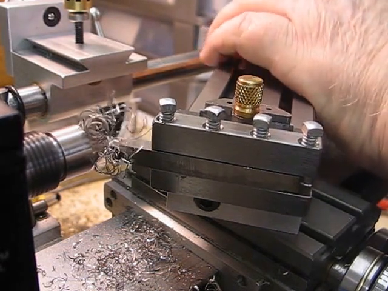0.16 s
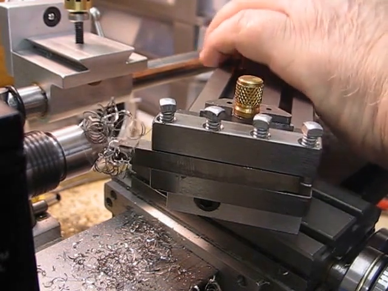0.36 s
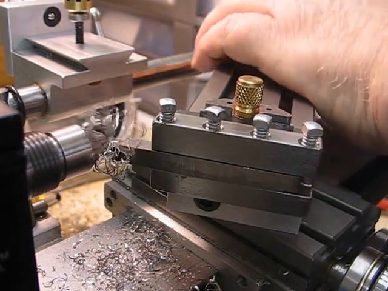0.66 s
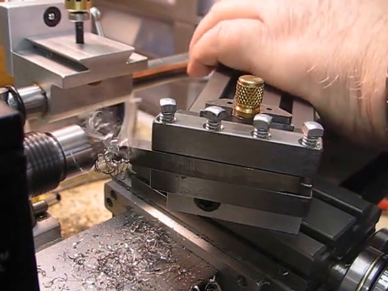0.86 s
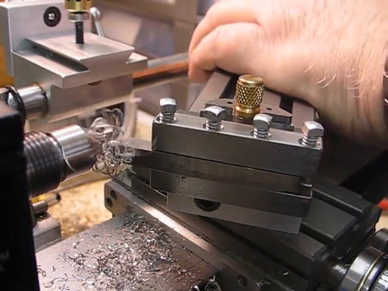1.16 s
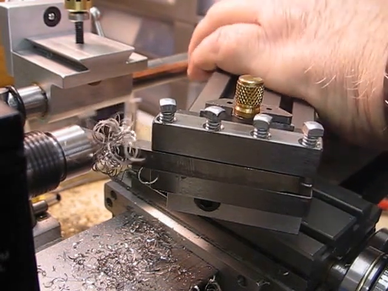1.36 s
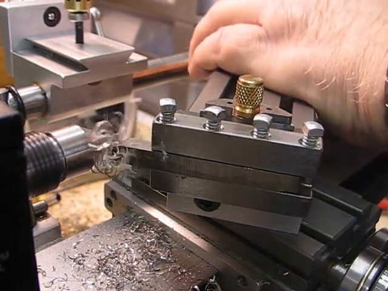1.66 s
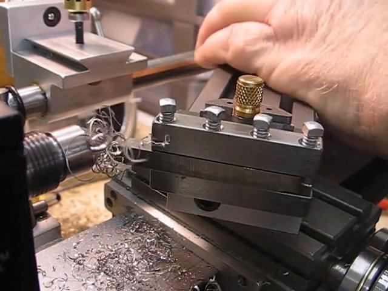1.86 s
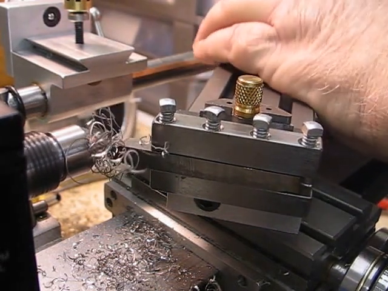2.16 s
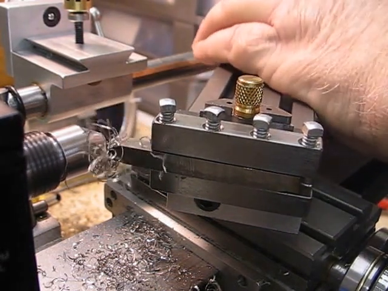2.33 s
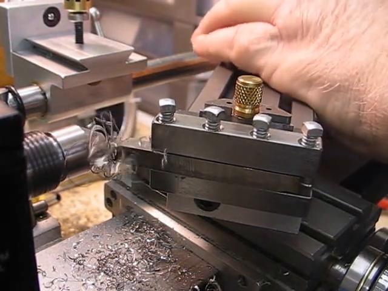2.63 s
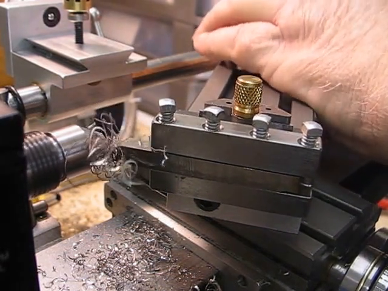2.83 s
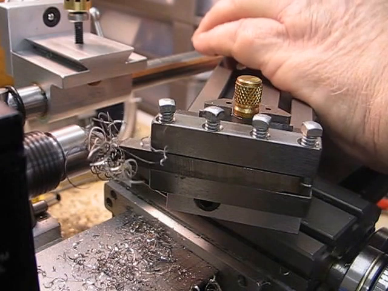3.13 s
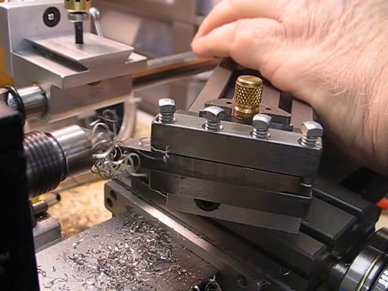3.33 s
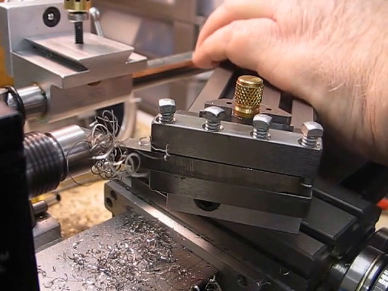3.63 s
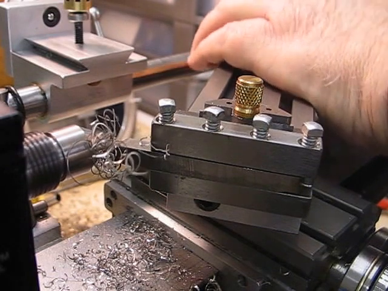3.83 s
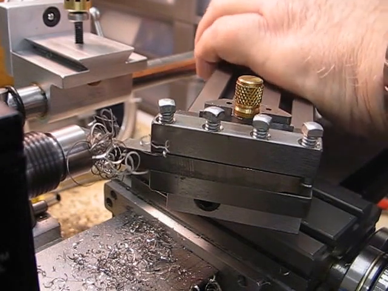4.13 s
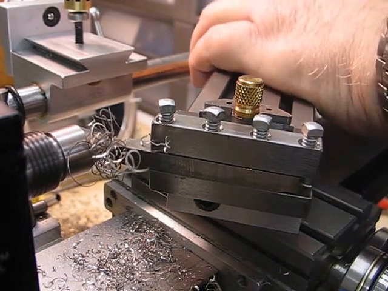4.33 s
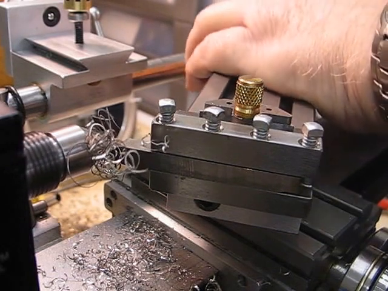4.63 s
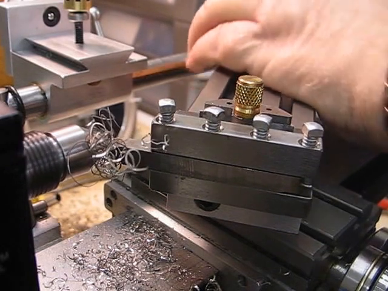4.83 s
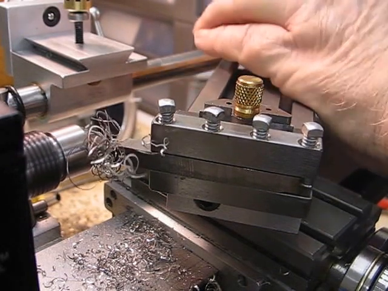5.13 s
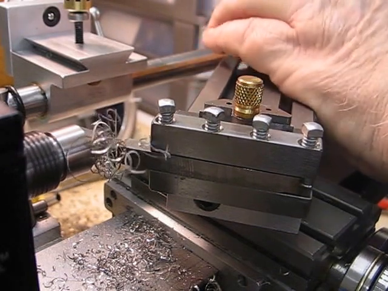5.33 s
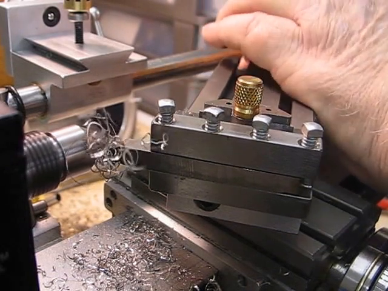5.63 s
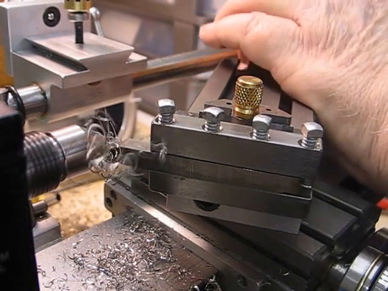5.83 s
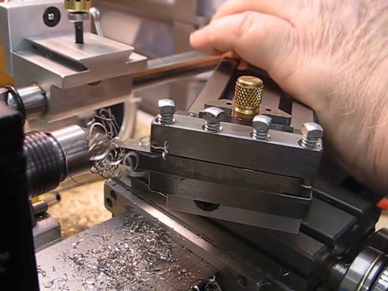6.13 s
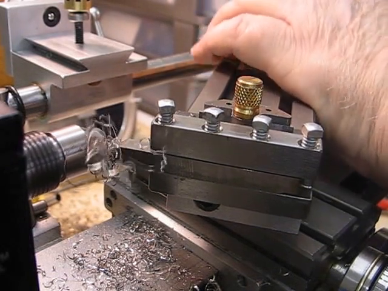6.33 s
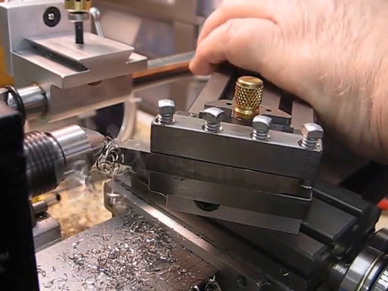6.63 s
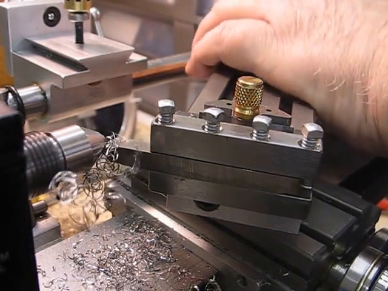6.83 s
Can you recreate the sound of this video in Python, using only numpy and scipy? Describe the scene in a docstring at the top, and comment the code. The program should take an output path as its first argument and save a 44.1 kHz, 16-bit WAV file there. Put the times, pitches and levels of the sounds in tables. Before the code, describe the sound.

A small lathe is heard close up in a workshop with a short, dull room tail. From 0 s its motor gives a steady low hum with a faint whine, under soft drive and fan noise. A light, grainy scrape grows during the first second, fluttering rapidly with the spinning work. Around 1 s the first short squeals appear, midrange and slightly nasal, sagging as they swell. From 1.8 to 2.4 s they cluster, with a rough low groan near 2.1 s. After a sparser moment, dense stuttering chatter fills 2.9 to 4.5 s, with brighter metallic overtones and stronger scraping. From 4.6 s squeals are scattered while the hum beats and the bed rumbles. Thin, very high squeaks stand out around 5.6 to 5.9 s, the strongest at 5.9. From 6.7 s squeals, squeaks and tearing bursts crowd together, peaking near 6.9 s as the scrape surges and everything stops mid-cut.

```python
"""A tool shaves stainless steel on a small lathe and chatters in short squeals: tones with overtones
whose pitch sags as they swell. The chip scrapes as grainy noise that rings the tool post, and the
edge squeaks in short high pings. The bed groans and rumbles as low tones and shaped noise, and the
bench shudders. Behind them the mains motor hums and whines in steady tones over drive and fan noise,
and the workshop adds a short tail to the cutting sounds."""
import sys
import numpy as np
from scipy import signal
from scipy.fft import rfft, irfft
from scipy.io import wavfile
from scipy.ndimage import uniform_filter1d

SR = 44100
rng = np.random.default_rng(int(sys.argv[2]) if len(sys.argv) > 2 else 0)


def wrap_up_sound(samples):
    """Save the sound to the file named by the first command line argument, as 16-bit audio."""
    columns = np.atleast_2d(samples).T
    # keep every value between -1 and 1, then stretch to whole-number steps
    tamed = np.clip(columns, -1, 1)
    steps = np.round(tamed * 32767).astype(np.int16)
    wavfile.write(sys.argv[1], SR, steps)


N = 307818
TIME = np.arange(N) / SR   # s

# Chatter squeals: peak t/s, level/dB, rise/ms, fall/ms (3 ms or more is used), lowest pitch f/Hz,
# strength of the overtones from the third up/dB
SQUEALS = [(1.049, -24.5, 25, 22, 1470, -11), (1.081, -16, 11, 8.5, 1349, -13),
           (1.269, -20.5, 7, 12, 1367, -12), (1.287, -19.5, 8, 12, 1463, -13),
           (1.326, -19, 8, 11, 1443, -15), (1.477, -15, 6.5, 7.6, 1230, -2), (1.486, -18, 6, 20, 1235, 1),
           (1.555, -26.5, 18, 9.4, 1180, -7), (1.797, -15.5, 6, 9, 1250, -7),
           (1.806, -16, 5, 13.4, 1228, -2), (1.871, -23, 10, 7.9, 1192, -15),
           (1.972, -17.5, 18, 19.7, 1340, -13), (1.99, -16, 10, 19.7, 1202, -2),
           (2.018, -20, 5, 5.4, 1286, -20), (2.063, -22, 21, 7.2, 1225, -16),
           (2.085, -24, 6, 6.1, 1406, -18), (2.125, -26.5, 16, 12.5, 1244, -12.5),
           (2.182, -14.5, 13, 15.5, 1273, -10), (2.207, -20, 16, 13.4, 1177, 6.5),
           (2.241, -18.5, 15, 2.6, 1180, -17), (2.273, -19.5, 22, 14, 1194, -15),
           (2.338, -30.5, 29, 12.5, 1230, -14.5), (2.372, -25, 14, 13, 1426, -18),
           (2.429, -15, 8, 3.8, 1370, -16), (2.588, -27, 19, 8.3, 1494, -18),
           (2.84, -19, 9, 6.9, 1377, -10), (2.926, -11.5, 7, 10, 1310, -7.5),
           (2.989, -13, 12, 17, 1277, -9.5), (3.062, -26, 21, 11.3, 1248, -9),
           (3.116, -14.5, 7, 7.2, 1260, -7.5), (3.127, -15, 5.4, 19, 1219, -2),
           (3.158, -15.5, 5, 4.5, 1330, -10), (3.194, -17.5, 13, 9.6, 1277, -10),
           (3.21, -15.5, 5, 11.9, 1230, -4), (3.228, -22, 9, 9.4, 1310, -20),
           (3.254, -21.5, 7, 6, 1243, -12), (3.291, -26.5, 27, 10.3, 1390, -1),
           (3.337, -11, 6, 5.8, 1248, -2), (3.361, -15.5, 14, 18, 1276, -7.5),
           (3.412, -25, 14, 24, 1232, -12), (3.524, -16.5, 18, 17.5, 1401, -12),
           (3.557, -13.5, 7, 5.6, 1287, -5), (3.576, -15, 11, 9.1, 1264, -8.5),
           (3.63, -22.5, 11, 12, 1252, -13), (3.731, -24.5, 33, 20, 1419, -13.5),
           (3.797, -27.5, 25, 28, 1467, -24), (3.931, -17.5, 6, 12.5, 1398, -6.5),
           (3.976, -16, 20, 19.7, 1345, -13.5), (3.995, -13, 9, 8, 1169, -2), (4.009, -19, 6, 11, 1175, -1),
           (4.034, -18, 7, 5.4, 1287, -13), (4.065, -16, 15, 18.4, 1121, -2.5),
           (4.078, -12.5, 5, 3.5, 1178, 2.2), (4.12, -15.5, 24, 24, 1377, -19),
           (4.142, -13, 8, 8.9, 1177, -4.3), (4.219, -18.5, 19, 15, 1405, -11),
           (4.24, -19, 8, 8.3, 1398, -10), (4.279, -12, 10, 17.4, 1292, -8.5),
           (4.313, -22.5, 5, 11, 1387, -11.5), (4.348, -25, 8, 9.2, 1334, -6.5),
           (4.383, -19.5, 7, 16, 1428, -10.5), (4.423, -13, 12, 7.4, 1310, -19),
           (4.447, -18, 9, 3.8, 1378, -15.5), (4.481, -12, 9, 12, 1265, -4.5),
           (4.502, -18.5, 11, 10, 1303, -7), (4.556, -25.5, 12, 17, 1232, -11),
           (4.856, -15.5, 6, 3.9, 1381, -13), (4.888, -17.5, 18, 8.8, 1410, -7),
           (5.126, -17, 8, 4.3, 1373, -10), (5.141, -29, 6, 5, 1450, -13),
           (5.358, -22, 6, 13.2, 1420, -8.5), (5.653, -26, 7, 9.7, 1397, -4.5),
           (5.702, -11, 17, 6.1, 1312, -5), (5.736, -23.5, 15, 34, 1390, -5.5),
           (5.804, -28.5, 18, 16, 1450, -3.5), (5.912, -13.5, 10, 14.5, 1325, -7),
           (5.952, -22.5, 10, 13, 1436, -3.5), (6.137, -25, 17, 18, 1432, -20),
           (6.23, -25, 5, 10, 1437, -4.5), (6.256, -27.5, 12, 27.7, 1463, -15.5),
           (6.723, -13.5, 16, 15, 1342, -8.5), (6.742, -15.5, 8, 18.3, 1417, -7),
           (6.78, -25.5, 7, 5.1, 1383, -14), (6.798, -30, 7, 12.4, 1402, -9.5),
           (6.821, -23.5, 8, 8, 1436, -22), (6.874, -28, 7, 19, 1434, -12),
           (6.91, -8.5, 13, 2.27, 1330, -11), (6.942, -16, 13, 17, 1337, -3.5)]
# Ringing modes of the tool post: f/Hz, width/Hz, level under the scrape/dB, level under a squeal/dB,
# swing with each turn/dB, lag of that swing/turns
POST_MODES = [(1234, 20, -25.5, -11, -2, 0), (1355, 18, -19, -47, 9, 0), (2486, 78, -17.5, 2.5, -4, 0),
              (2870, 46, -13.5, -5, -6.5, 0), (3434, 33, -15, 13, 4, 0), (3701, 65, -14, 15.5, -0.5, 0),
              (4967, 44, -20, 4, 10, 0), (5547, 24, -17.5, -13, 3.5, 0), (6226, 190, -8.5, 4, 8.5, 0.45),
              (6497, 157, -9.5, -4, 6, 0.13), (6754, 114, -12, 1, 10, 0.00091),
              (7064, 83, -8, -1, 3, -0.14), (8973, 53, -17, 19, -1.5, 0), (11160, 900, 4, 2, -0.5, 0)]
# Moments when the edge snags: t/s, squeak level/dB, level of the tearing burst/dB
SNAGS = [(1.4684, -31, -42), (1.635, -42, -29), (2.2064, -28.5, -18), (2.574, -40, -24.5), (2.73, -40, -26),
         (2.8123, -18, -18), (2.9641, -23, -31), (3.0569, -26, -31), (3.1889, -22.5, -28),
         (3.3211, -28, -22), (3.6235, -19.5, -30.5), (4.0664, -26.5, -17.5), (4.136, -15.5, -29.5),
         (4.449, -16.5, -29), (4.545, -40, -25.5), (5.106, -34.5, -27), (5.142, -18, -28.5),
         (5.45, -36.5, -30.5), (5.5906, -10.5, -30.5), (5.6822, -15.5, -20.5), (5.7146, -14.5, -16),
         (5.78, -32, -24), (5.9, -1, -14.5), (6.101, -13, -21.5), (6.13, -36, -22.5), (6.23, -38, -23.5),
         (6.289, -17.5, -23.5), (6.64, -30, -26), (6.7048, -37.5, -13), (6.756, -8.5, -13),
         (6.7911, -6, -19), (6.82, -7, -37), (6.855, -35, -19), (6.949, -27.5, -13)]
# How hard the cut loads the bed, as the level of its rumble: t/s, level/dB
LOAD = [(0.0, -45), (0.15, -47.5), (1.16, -40.5), (1.32, -42.5), (1.77, -36.5), (2.41, -37.5), (2.7, -37),
        (2.86, -36), (3.3, -36.5), (3.75, -39), (3.89, -37), (4.59, -38), (5.46, -33), (5.56, -37),
        (6.53, -35.5), (6.98, -32)]


def from_db(db):
    """Turn decibels into gain."""
    return 10 ** (np.asarray(db) / 20)


def rms_one(x):
    """Scale to an rms of 1."""
    return x / np.sqrt(np.mean(x ** 2) + 1e-20)


def in_time(rows):
    """Draw straight lines between the rows and give every column sample by sample."""
    s, *columns = np.transpose(rows)
    return [np.interp(TIME, s, c) for c in columns]


def drift(rate_hz):
    """Slow random wandering with rms 1: noise through two low-pass poles, made at every 40th sample."""
    r = np.exp(-2 * np.pi * rate_hz * 40 / SR)
    noise = rng.standard_normal(N // 40 + 2002)
    slow = signal.lfilter([1], [1, -2 * r, r * r], noise)[2000:]
    return np.interp(np.arange(N) / 40, np.arange(len(slow)), rms_one(slow))


def resonate(x, hz, width_hz):
    """One resonance, like a struck part that rings at its own pitch; gain about 1 at the top."""
    r = np.exp(-np.pi * width_hz / SR)
    top = [(1 - r * r) / 2, 0, (r * r - 1) / 2]
    bottom = [1, -2 * r * np.cos(2 * np.pi * hz / SR), r * r]
    return signal.lfilter(top, bottom, x + 1e-18)


def ringing_noise(hz, width_hz, second_width_hz):
    """A mode kept ringing by random shaking: noise through two resonances at one pitch, rms 1."""
    once = resonate(rng.standard_normal(N), hz, width_hz)
    return rms_one(resonate(once, hz, second_width_hz))


def coloured(spectrum):
    """Steady noise with the given spectrum, rms 1."""
    hz = np.maximum(np.fft.rfftfreq(N, 1 / SR), 1)
    points = np.array(spectrum)
    shape = from_db(np.interp(np.log(hz), np.log(points[:, 0]), points[:, 1]))
    return rms_one(irfft(rfft(rng.standard_normal(N)) * shape, N))


def swell(s, rise, fall):
    """Samples around a peak, their time from it, and a swell in dB: -8 dB one rise before, one fall after."""
    at = slice(max(int((s - 3 * rise) * SR), 0), min(int((s + 4 * fall) * SR), N))
    t = TIME[at] - s
    return at, t, -8 * np.where(t < 0, (np.abs(t) / rise) ** 1.7, (np.abs(t) / fall) ** 1.07)


def squeals():
    """One chattering tool: overlapping squeals share its pitch; overtones appear only near a swell's top."""
    free_hz = 1457
    entry_share, exit_share = .45, .45   # how far towards the free pitch a squeal starts and ends
    second_db_per_hz = 0.0382   # the second partial grows with the depth of the sag
    # Second partial of the squeals, before the sag adds to it: t/s, level against the first/dB
    second_partial = [(1.0, -13), (2.2, -16), (3.3, -13.5), (4.5, -13.5), (5.5, -16), (6.3, -14),
                      (6.98, -17)]
    ripple = from_db(2.5 * drift(115))
    waver = 1 + 0.00587 * drift(78)
    second_db, = in_time(second_partial)
    power = np.full((8, N), 1e-12)   # one row for each partial
    pull = np.full(N, 1e-12 * free_hz)   # pitch weighted by power
    for s, level_db, rise, fall, low_hz, overtones_db in SQUEALS:
        rise, fall = max(rise, 3) / 1000, max(fall, 3) / 1000   # s
        at, t, swell_db = swell(s, rise, fall)
        sag_hz = free_hz - low_hz
        bend_times = [-.9 * rise, 0, .4 * fall, 1.8 * fall]
        lift_hz = sag_hz * np.interp(t, bend_times, [entry_share, 0, 0, exit_share])
        # The tool leaves the cut and snaps back as the pitch sags: overtones are weaker while it is up
        slack_db = -.05 * lift_hz.clip(0)
        pull[at] += from_db(2 * (level_db + swell_db)) * (low_hz + lift_hz)
        second = second_db[at] + second_db_per_hz * min(sag_hz, 150) + 1.26 * swell_db
        partials_db = [swell_db, second]
        for k in range(3, 9):
            slope_db = -12.5 - 2.65 * (k - 4.5)
            partials_db.append(overtones_db + slope_db + 1.3 * swell_db + k / 2 * slack_db)
        power[:, at] += from_db(2 * (level_db + np.array(partials_db)))
    pitch_hz = uniform_filter1d(pull / power[0], size=130) * waver
    phase = 2 * np.pi * np.cumsum(pitch_hz) / SR
    partials = sum(np.sqrt(p) * np.sin((k + 1) * phase) for k, p in enumerate(power))
    tones = np.sqrt(2) * ripple * partials
    return tones + sum(from_db(db) * resonate(tones, hz, width) for hz, width, _, db, *_ in POST_MODES)


def tearing(steady_db):
    """Strength of the scrape: a steady part, a share of every squeal and a burst at every snag."""
    share_db = -8.5   # the chip tears harder under each squeal
    burst_rise, burst_fall = 0.0032, 0.03   # s
    power = from_db(2 * steady_db)
    for s, level_db, rise, fall, *_ in SQUEALS:
        # This swell lasts about twice as long as the squeal
        at, _, swell_db = swell(s, 2.14 * max(rise, 3) / 1000, 1.94 * max(fall, 3) / 1000)
        power[at] += from_db(2 * (level_db + share_db + swell_db))
    for s, _, tear_db in SNAGS:
        at, _, swell_db = swell(s + burst_rise, burst_rise, burst_fall)
        power[at] += from_db(2 * (tear_db + swell_db))
    return np.sqrt(power)


def cut():
    """The chip tears in dense uneven grains; the work runs out of true, so the post modes flare in turn."""
    ring_follows = 0.34   # the tool rings more while the chip tears harder
    # The cut: t/s, steady chip scrape/dB, edge whistle/dB, tool ring under steady scraping/dB
    cut_levels = [(0, -44, -57, -60), (.33, -38.5, -51, -48), (.95, -39.5, -51, -50),
                  (1.2, -35, -49, -40.5), (1.8, -33, -49, -42.5), (2.39, -32.5, -47, -34),
                  (2.64, -37, -45, -38), (3.0, -37, -46, -36), (3.44, -29.5, -45, -30),
                  (3.9, -31, -41.5, -41.5), (4.14, -29, -41, -34), (4.47, -30, -48, -39),
                  (4.65, -31.5, -46, -31.5), (4.95, -30.5, -40, -37.5), (5.42, -31.5, -45.5, -37),
                  (5.95, -34, -41.5, -38), (6.3, -29, -37.5, -35.5), (6.66, -33.5, -43, -37),
                  (6.98, -23.5, -33, -28)]
    # The spindle: t/s, turns made so far
    spindle = [(0, -.45), (.7, 21.97), (1.2, 37.9), (2.2, 69.7), (3.2, 101.29), (4.2, 133.08),
               (4.95, 156.79), (6.45, 204.1), (6.98, 220.92)]
    # Bare tearing noise against the ringing modes: t/s, level/dB
    bare_tearing = [(0, -1.5), (1.0, -3.5), (2.5, 0), (4.0, -1.04), (5.5, -2.5), (6.3, 0), (6.98, -3.5)]
    scrape_db, whistle_db, ring_db = in_time(cut_levels)
    turns, = in_time(spindle)
    grain_sizes = from_db(1.5 * np.minimum(rng.exponential(1, N), 5))
    tears = rng.standard_normal(N) * grain_sizes
    modes, wobble = 0, .08 * drift(12)   # wobble in turns
    for k, (hz, width, db, _, swing_db, lag) in enumerate(POST_MODES):
        turn_db = swing_db * np.cos(2 * np.pi * (turns + wobble - lag))
        flare = from_db(db + 2.5 * drift(35) + turn_db)
        # Dividing by the root of the width keeps wide modes from being louder; signs alternate
        modes = modes + resonate(flare * tears, hz, width) / np.sqrt(width) * (-1) ** k
    strength = tearing(scrape_db)
    bare_db, = in_time(bare_tearing)
    bare = from_db(bare_db + 2.07 * drift(74)) * rms_one(np.diff(tears, prepend=0))
    scrape = strength * (rms_one(modes) + bare)
    pinch = from_db(2.3 * drift(40) + 1.4 * np.cos(2 * np.pi * (turns - .1)))
    whistle_band = resonate(resonate(pinch * tears, 9670, 290), 9480, 400)
    whistle = from_db(whistle_db) * rms_one(whistle_band)
    ring_band = resonate(resonate(rng.standard_normal(N), 1464, 25), 1472, 53)
    harder = (strength / from_db(scrape_db)) ** ring_follows
    ring = from_db(ring_db + 4.4 * drift(7.3)) * harder * rms_one(ring_band)
    return scrape + whistle + ring


def squeaks():
    """The edge catches and sings briefly at its high mode, sagging a little."""
    rise_s, t60_s = 0.0018, 0.043   # t60: time to fall by 60 dB
    out = np.zeros(N)
    for s, level_db, _ in SNAGS:
        at = slice(int(s * SR), min(int((s + .15) * SR), N))
        t = TIME[at] - s
        ping = (1 - np.exp(-t / rise_s)) ** 2 * from_db(level_db - 60 * t / t60_s)
        # Starts at 9750 Hz and sags by 5 Hz each ms
        out[at] += ping * np.sin(2 * np.pi * (9750 * t - 2500 * t ** 2))
    return out * from_db(2.0 * drift(120))


def groan():
    """A low mode of the bed sings roughly in short patches that fade in and out."""
    rise_share = .4
    # Bed groans: peak t/s, level/dB, f/Hz, rise and fall together/ms
    groans = [(1.251, -33, 704, 22), (1.79, -31.5, 693, 78), (2.138, -20, 686, 29), (2.775, -31.5, 650, 22),
              (3.07, -38, 702, 63), (3.314, -31.5, 697, 61), (3.518, -27.5, 690, 38), (3.96, -29, 698, 96),
              (4.05, -29.5, 693.5, 98), (4.136, -32, 679, 44), (4.836, -31, 677, 34.5),
              (5.884, -35.5, 674, 35), (6.202, -37, 670, 32), (6.6, -35, 650, 33), (6.702, -28.5, 680, 36),
              (6.965, -40, 680, 37)]
    out, wander = np.zeros(N), 0.26 * drift(37)   # wander of the phase in radians
    for s, level_db, hz, length in groans:
        at, t, swell_db = swell(s, rise_share * length / 1000, (1 - rise_share) * length / 1000)
        out[at] += from_db(level_db + swell_db) * np.sin(2 * np.pi * hz * TIME[at] + wander[at])
    return np.sqrt(2) * from_db(2.0 * drift(37.5)) * out


def rumble():
    """The cutting force shakes the bed: broad noise with a few low modes standing out."""
    # Spectrum of the force: f/Hz, level per Hz/dB
    force_spectrum = [(250, -8), (350, -30), (420, -1.5), (550, -6), (800, -2.5), (1000, -7.5), (1200, -2),
                      (2000, -0.5), (3500, -2), (6000, -25), (11500, -51)]
    # Bed modes: f/Hz, width/Hz, gain over the broad noise/dB
    bed_modes = [(342, 24, 17), (610, 180, 14), (699, 45, 21.5), (838, 83, 17), (1014, 88, 15)]
    level_db, = in_time(LOAD)
    force = coloured(force_spectrum)
    modes = sum(from_db(db + 2.0 * drift(6.5)) * resonate(force, hz, width) for hz, width, db in bed_modes)
    return from_db(level_db) * rms_one(force + modes)


def bench():
    """The bench shudders in one low mode, more under load."""
    level_db, follows = -49.5, .8   # level at a load of -39 dB; dB gained for each dB of load
    load_db, = in_time(LOAD)
    shudder = ringing_noise(50.8, 5, 40)
    return from_db(level_db + follows * (load_db + 39)) * shudder


def motor():
    """Magnetic hum on multiples of the doubled mains; the cut shakes frame modes that beat with it."""
    hum_hz, third_db, whine_db = 120.02, -46.5, -25.5
    beat_hz, beat_peak_s, beat_db = 8.45, 5.97, 3   # a tone just above the second multiple beats with it
    # Hum: t/s, first multiple/dB, second multiple/dB, shaking of the frame/dB
    hum = [(0, -48, -27.5, -59), (.15, -44, -28.5, -70), (.75, -40, -27, -63), (.92, -37.5, -25.5, -53),
           (1.45, -38, -25.5, -68), (1.7, -39.5, -25, -37.5), (2.4, -38, -24.5, -50),
           (3.0, -37.5, -25.5, -47), (4.0, -37, -24.5, -47.5), (4.5, -37, -24.5, -40),
           (4.75, -45, -30, -36.5), (5.6, -46.5, -26, -36.5), (6.5, -41.5, -29.5, -38.5),
           (6.98, -38.5, -27, -43)]
    # Whine: multiple of the hum pitch, level within the whine/dB
    whine = [(4, -27), (5, -31), (6, -28.5), (7, -30.5), (8, -22), (9, -30.5), (10, -21.5), (11, -28.5),
             (12, -27.5), (13, -30), (14, -35.5), (15, -59), (16, -54), (17, -28.5), (18, -28), (19, -28.5),
             (20, -20.5), (21, -26), (22, -49), (23, -26), (24, -32.5), (25, -32.5), (26, -41), (27, -63.5),
             (28, -31), (29, -24.5), (30, -27)]
    # Frame modes beside the hum: f/Hz, width/Hz, level at a shake of -39.5 dB/dB,
    # share of the shake's swing that it follows
    frame_modes = [(118.6, 9.3, -43, 0.59), (242.8, 7.7, -36.5, 1.1)]
    # Cover mode just under the third multiple: t/s, level/dB
    cover_level = [(0, -64), (.9, -57), (2.3, -51), (2.5, -41), (3.6, -39.5), (4.4, -42), (5.2, -45.5),
                   (5.7, -39.5), (6.3, -41.5), (6.98, -43.5)]
    first_db, second_db, shake_db = in_time(hum)
    turn = 2 * np.pi * hum_hz * TIME
    tones = from_db(first_db) * np.sin(turn)
    tones += from_db(second_db) * np.sin(2 * turn)
    tones += from_db(third_db) * np.sin(3 * turn)
    beat = 2 * np.pi * beat_hz * (TIME - beat_peak_s) + 0.13 * drift(7.5)
    tones += from_db(shake_db + beat_db) * np.sin(2 * turn + beat)
    for k, level_db in whine:
        level = from_db(whine_db + level_db + 1.8 * drift(8.2))
        tones += level * np.sin(k * turn + rng.uniform(0, 2 * np.pi))
    frame = 0
    for hz, width, db, share in frame_modes:
        frame = frame + from_db(db + share * (shake_db + 39.5)) * ringing_noise(hz, width, 2 * width)
    cover = from_db(in_time(cover_level)[0]) * ringing_noise(352.2, 11.8, 2 * 11.8)
    return np.sqrt(2) * tones + frame + cover


def drive():
    """Drive and fan noise: steady shaped noise whose level flutters a little."""
    # Spectrum of the noise: f/Hz, level per Hz/dB
    drive_spectrum = [(15, -75), (25, -16), (117, -16.5), (182, -13), (207, -8.5), (241, -5), (296, -14.5),
                      (355, -9.5), (414, -20), (945, -18), (1890, -18.5), (2450, -14.5), (3170, -16),
                      (9850, -25), (11800, -9), (15300, -88), (22000, -120)]
    return from_db(-35.5 + 0.9 * drift(19)) * coloured(drive_spectrum)


def shop(x):
    """Diffuse room tail: noise that dies away, duller than the direct sound."""
    t60_s = .25   # time to fall by 60 dB
    t = np.arange(SR // 2) / SR
    dull = signal.lfilter([1], [1, -.5], rng.standard_normal(len(t)))
    tail = dull * from_db(-60 * t / t60_s) * (t > .006)   # silent for the first 6 ms
    return signal.fftconvolve(x, tail / np.sqrt(np.sum(tail ** 2)))[:N]


def scene():
    """The cut with its room tail, then motor, bench and drive noise; one channel."""
    tool = squeals() + squeaks() + cut() + rumble() + groan()
    tail = from_db(-14) * shop(tool)
    return (tool + tail + motor() + bench() + drive())[None]


def record(dry):
    """Peaks are rounded, then the top is cut gently from 11500 Hz and steeply up to 11900 Hz."""
    rounded = 0.8 * np.tanh(dry / 0.72)
    soft = signal.sosfilt(signal.butter(3, 11500, fs=SR, output="sos"), rounded)
    return signal.sosfilt(signal.cheby2(12, 60, 11900, fs=SR, output="sos"), soft)


dry = scene()
out = record(dry)
wrap_up_sound(out)
```